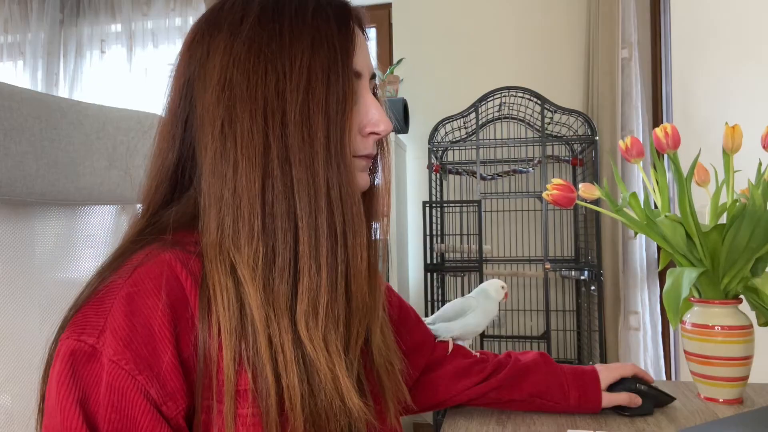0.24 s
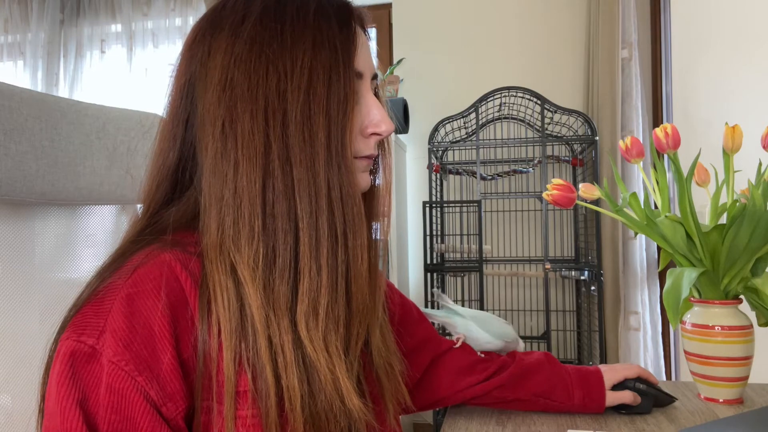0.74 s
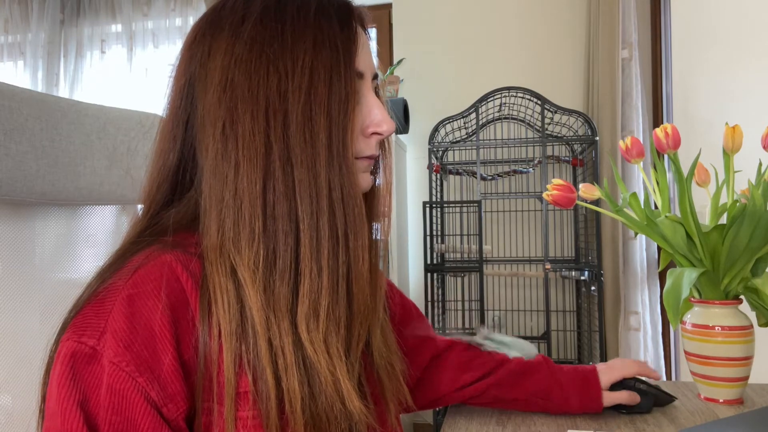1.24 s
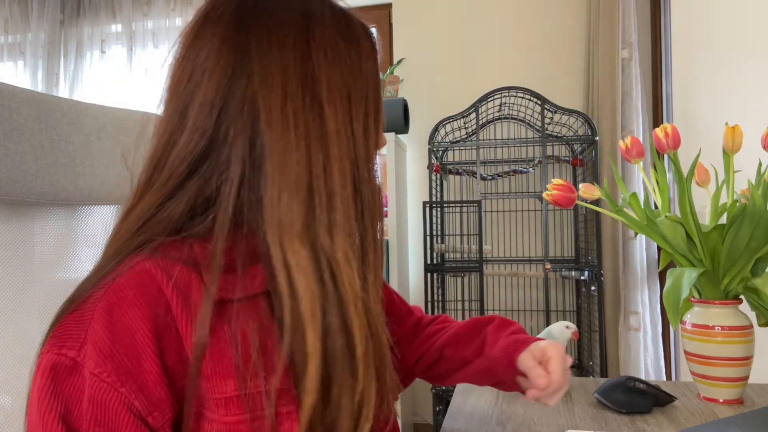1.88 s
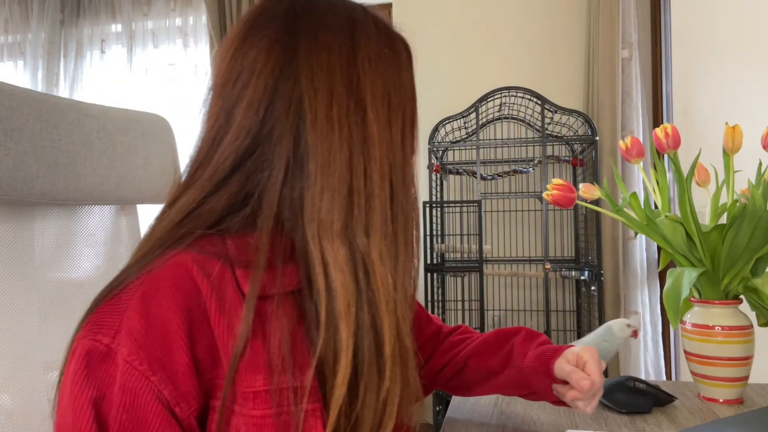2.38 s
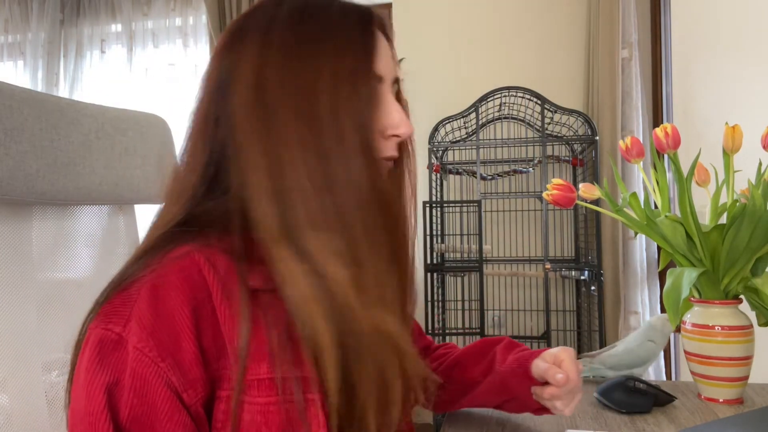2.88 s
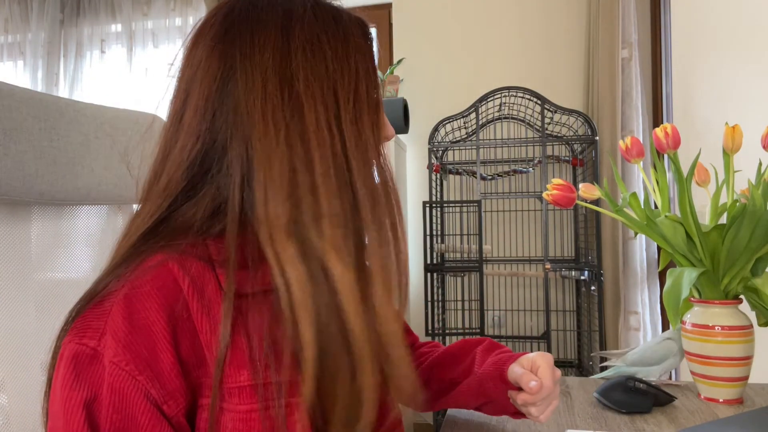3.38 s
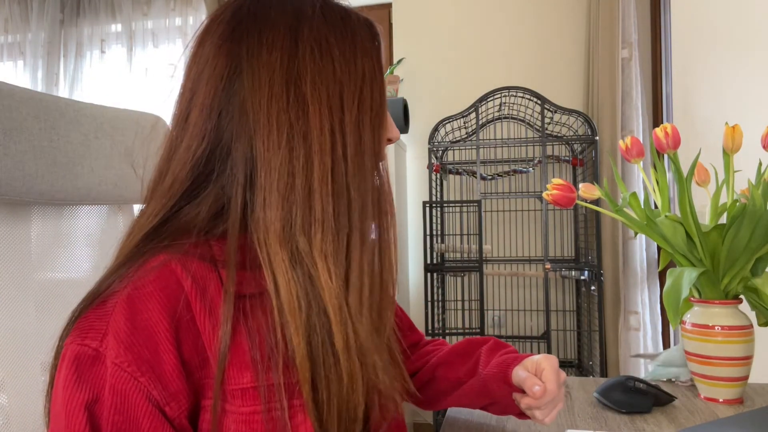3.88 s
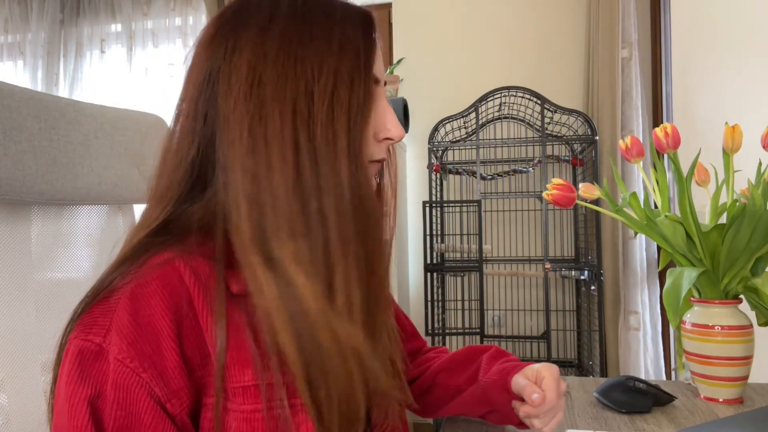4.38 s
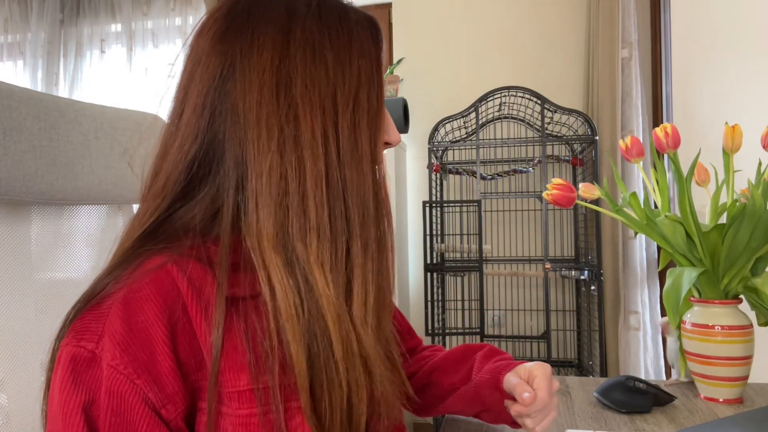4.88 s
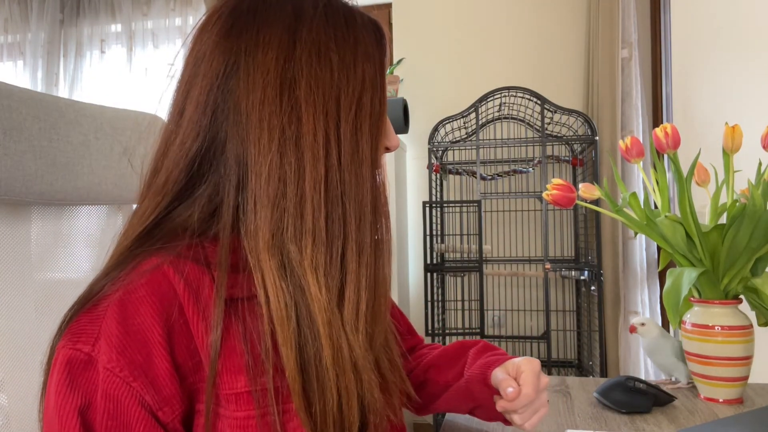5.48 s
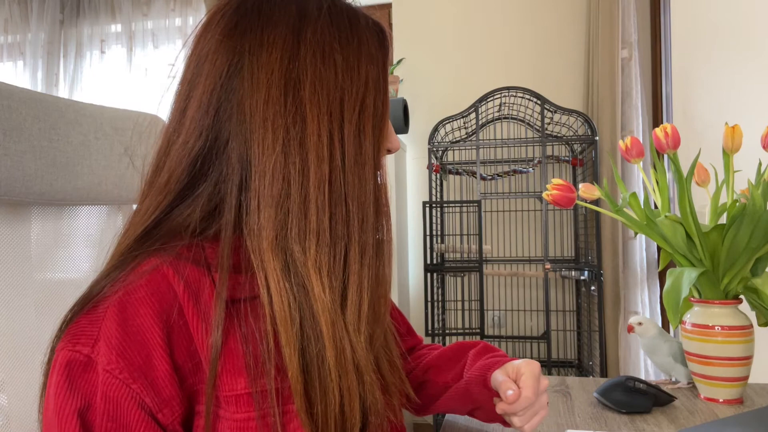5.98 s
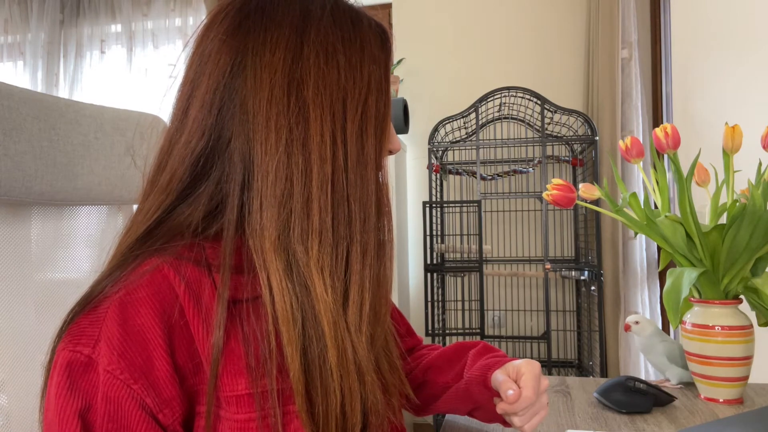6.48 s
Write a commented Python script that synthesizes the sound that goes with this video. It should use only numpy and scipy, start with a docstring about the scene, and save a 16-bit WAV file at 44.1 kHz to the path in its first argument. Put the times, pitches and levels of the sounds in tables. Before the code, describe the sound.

In a small airy office, a mug is set down and scrapes, followed by scratchy sleeve scuffs, crackly clicks and soft desk taps.

```python
"""A ceramic mug is set down on a desk and slides a little: struck modes, a rattle and grating friction. Then a
sleeve and long hair rustle as someone turns in a chair: chance slips of fibres, with short scratchy scuffs and
dry clicks that ring through folds of cloth; one sharp click at 2.557 s is the bright crack of a desk tap. Light
taps are struck modes of the desk; dull rubs, thin squeaks and a tink come and go. An appliance hums low, as
wavering sines, in the airy small office."""
import sys
import numpy as np
from scipy import signal
from scipy.fft import rfft, irfft, next_fast_len
from scipy.io import wavfile

SR = 44100
rng = np.random.default_rng(int(sys.argv[2]) if len(sys.argv) > 2 else 0)


def dump_mix(stems):
    """Bounce the given channels to the path in sys.argv[1] as a 16-bit WAV at rate SR."""
    frames = np.atleast_2d(stems).T  # one column per channel
    limited = np.clip(frames, -1, 1)  # hard clip at full scale
    pcm = np.round(limited * 32767).astype(np.int16)
    wavfile.write(sys.argv[1], SR, pcm)


N = 297234
TIME = np.arange(N) / SR  # s
# Table levels are relative: layer trims, random variation and the room still act on them.


def from_db(db):
    """Decibels to gain."""
    return 10 ** (np.asarray(db) / 20)


def rms_one(x):
    """Scale to unit rms."""
    return x / np.sqrt(np.mean(x ** 2) + 1e-20)


def at_hz(points, hz):
    """Read a table on a log-frequency axis."""
    known_hz, values = np.transpose(points)
    return np.interp(np.log(np.maximum(hz, 1)), np.log(known_hz), values)


def coloured(x, spectrum):
    """Give a steady excitation a spectrum; rms 1."""
    size = next_fast_len(N)
    hz = np.fft.rfftfreq(size, 1 / SR)
    shaped = rfft(x, size) * from_db(at_hz(spectrum, hz))
    return rms_one(irfft(shaped, size)[:N])


def lowpassed(x, order, cutoff_hz):
    """Roll off the treble with a Butterworth filter."""
    return signal.sosfilt(signal.butter(order, cutoff_hz, fs=SR, output="sos"), x)


def drift(rate):
    """Slow chance with spread 1, changing about rate times a second."""
    step = 40  # samples between drawn points
    r = np.exp(-2 * np.pi * rate * step / SR)
    noise = rng.standard_normal(N // step + 2002)
    slow = signal.lfilter([1], [1, -2 * r, r * r], noise)[2000:]  # skip the filter's start
    return np.interp(np.arange(N) / step, np.arange(len(slow)), rms_one(slow))


def slips(per_s, spread_db):
    """Friction: tiny slips at random moments, of uneven size and sign."""
    born = rng.random(N) < per_s / SR
    sign = rng.choice([-1, 1], N)
    return born * sign * from_db(spread_db * np.minimum(rng.exponential(1, N), 4))


def ring(s, db, hz, t60):
    """Impulses at the times s set one damped mode ringing."""
    impulses = np.full(N, 1e-18)
    impulses[np.round(np.asarray(s) * SR).astype(int)] = from_db(db)
    r = np.exp(-np.log(1000) / (t60 * SR))
    w = 2 * np.pi * hz / SR
    return signal.lfilter([0, np.sin(w)], [1, -2 * r * np.cos(w), r * r], impulses)


def struck(blows, modes):
    """Each blow rings every mode: weight moves the low ones, a soft contact spares the high ones."""
    s, blow_db, weight_db, contact_hz = np.transpose(blows)
    out = 0
    for hz, mode_db, t60 in modes:
        heavy_db = weight_db * (hz < 800)
        soft_db = -10 * np.log10(1 + (hz / contact_hz) ** 4)
        chance_db = rng.standard_normal(len(s))
        out = out + ring(s, blow_db + mode_db + heavy_db + soft_db + chance_db, hz, t60)
    return out


def swell(t, s, db, length, shape):
    """Gain of one movement that peaks at s: it rises, rounds off and fades."""
    rise, fall, roundness = shape
    age = (t - s) / length
    return from_db(db) * np.exp(-np.abs(age / np.where(age < 0, rise, fall)) ** roundness)


def movements(rows, shape):
    """Gain over time of overlapping movements; their powers add."""
    return np.sqrt(sum(swell(TIME, *row, shape) ** 2 for row in rows))


def resonance(x, hz, q):
    """One resonance with gain 1 on top."""
    return signal.lfilter(*signal.iirpeak(hz, q, fs=SR), x)


def pitched_friction(grains, rows, level_db, shape, q):
    """Friction through two equal resonances in a row, swelling once for each table row."""
    out = 0
    for s, db, length, hz in rows:
        tone = rms_one(resonance(resonance(grains, hz, q), hz, q))
        out = out + swell(TIME, s, level_db + db, length, shape) * tone
    return out


def bent(x, share):
    """Let the pitch of a sound wander quickly by a small share."""
    return np.interp(np.cumsum(1 + share * drift(25.03)) % N, np.arange(N), x)


# Motor and mains lines: [pitch_hz, rms_db]
MOTOR_LINES = [(47.7, -42.8), (99.9, -61.8)]
# Fainter tones of the appliance casing: [pitch_hz, rms_db]
CASING_TONES = [(29, -63.5), (32.6, -68), (131, -74.5), (167, -76.5), (199, -74.5), (293.6, -76),
                (391.5, -83.5), (586.5, -86), (685, -80)]


def hum(lines, waver_db, waver_turns):
    """Steady tones that waver a little in strength and phase."""
    out = 0
    for hz, line_db in lines:
        phase = 2 * np.pi * (hz * TIME + rng.random() + waver_turns * drift(0.76))
        level = np.sqrt(2) * from_db(line_db + waver_db * drift(1.5))
        out = out + level * np.sin(phase)
    return out


# Spectrum of room air and hiss: [frequency_hz, level_db_per_hz]
AIR_COLOUR = [(20, 1), (45, -2.5), (70, -6.5), (95, -13), (190, -14.5), (330, -17), (550, -24.5),
              (950, -30), (1500, -35), (3000, -40.5), (6000, -44.3), (11000, -45.5), (16000, -48.5)]


def room_air(level_db):
    """A steady noise bed that falls away toward the treble."""
    return from_db(level_db) * coloured(rng.standard_normal(N), AIR_COLOUR)


# How long the room rings: [frequency_hz, t60_s]
ROOM_DECAY = [(100, 0.78), (500, 0.72), (1500, 0.52), (4000, 0.69), (14000, 0.44)]


def office_echoes(first_s, build_s):
    """Dense reflections that build up after the first wall and die by band; unit energy."""
    t = TIME[:SR // 2]
    tail = 0
    edges_hz = np.geomspace(60, 16000, 9)
    for low, high in zip(edges_hz, edges_hz[1:]):
        band_filter = signal.butter(2, [low, high], "band", fs=SR, output="sos")
        band = signal.sosfilt(band_filter, rng.standard_normal(len(t)))
        t60 = at_hz(ROOM_DECAY, np.sqrt(low * high))
        tail = tail + band * np.exp(-np.log(1000) * t / t60)
    tail = tail * np.clip((t - first_s) / build_s, 0, 1)
    return tail / np.sqrt(np.sum(tail ** 2))


# A soft low bump: [start_s, level_db, pitch_hz, t60_s]
LOW_BUMP = (0.142, -41, 74, .09)
# Light taps on the desk: [start_s, strength_db, weight_db, contact_hardness_hz]
DESK_TAPS = [(0.158, -16, -8, 7000), (2.139, -4.5, -13, 1790), (2.5565, 1.5, -7.5, 9000),
             (2.5605, -10, 3, 2500), (2.607, -20, 2, 700), (3.004, -9.5, -1.5, 1200),
             (3.221, -12.5, -5, 2000), (3.773, -8.5, -5, 2100), (3.781, -14, -12, 2000),
             (4.166, -7.5, -8, 2010), (4.216, -9, -15, 1700), (4.7474, -3, -10, 2500),
             (4.7508, -15, 8, 6000), (4.7529, -9, 11, 3000)]
# What the taps set ringing: [pitch_hz, level_db, t60_s]
DESK_MODES = [(350, -66, 0.084), (484, -57, .035), (500, -56.5, 0.047), (517, -57, 0.32), (540, -58, 0.035),
              (742, -56.5, 0.029), (890, -48.5, 0.0098), (1260, -49.5, 0.0078), (2100, -52.5, 0.0093),
              (2580, -55.5, 0.024), (3160, -54, 0.0084), (3750, -54, 0.01), (4100, -54, 0.0049),
              (9050, -47, 0.00088)]


def small_knocks(tap_db):
    """Light taps ring the desk's damped modes; a soft bump rings one low mode."""
    return from_db(tap_db) * struck(DESK_TAPS, DESK_MODES) + ring(*LOW_BUMP)


# Faint thin squeaks: [peak_s, level_db, length_s, pitch_hz]
THIN_SQUEAKS = [(0.19, -74, 0.005, 5900), (0.204, -72, 0.005, 6350)]
# Swell of squeaks, scuffs and chatters: [rise_lengths, fall_lengths, roundness]
CATCH_SHAPE = (0.63, 0.92, 1.75)


def squeaks():
    """Dense slips narrowed by resonance into two faint, thin squeaks."""
    grains = slips(per_s=5500, spread_db=0.0)
    return pitched_friction(grains, THIN_SQUEAKS, 0.0, CATCH_SHAPE, q=6)


# Dull rubs of the arm on the desk: [peak_s, level_db, length_s, pitch_hz]
ARM_RUBS = [(0.2, -74, 0.048, 754), (0.377, -72, 0.029, 700), (0.692, -72.5, 0.025, 710),
            (1.142, -60.5, 0.017, 278), (1.263, -63, 0.035, 295), (2.618, -74, 0.024, 345),
            (2.667, -62.5, 0.02, 205)]
# Swell of rubs and strokes: [rise_lengths, fall_lengths, roundness (1 pointed, 2 bell)]
DRAG_SHAPE = (1, 1.7, 1.95)


def rubs(level_db):
    """Cloth dragged under the weight of the arm gives a short, muffled murmur of the desk top."""
    grains = slips(per_s=2600, spread_db=2.5)
    return pitched_friction(grains, ARM_RUBS, level_db, DRAG_SHAPE, q=1.02)


# Modes of the mug's wall, rung by its scraping foot: [pitch_hz, width_hz, level_db]
WALL_MODES = [(980, 140, 5), (1343, 56, 4), (1790, 130, 5), (2090, 100, -13), (2430, 93, 0.5),
              (2950, 200, -31), (4400, 440, -38)]


def mug_wall(shift_db, wander):
    """Blunt slips ring the wall; as contact moves, its modes bend in pitch and take turns to lead."""
    grains = lowpassed(slips(per_s=3000, spread_db=0.5), 2, 4200)
    out = 0
    for hz, width, db in WALL_MODES:
        tone = rms_one(resonance(grains, hz, hz / width))
        out = out + bent(from_db(db + shift_db * drift(8.2)) * tone, wander)
    return rms_one(out)


# Mug meeting the desk, rim first, then settling: [start_s, strength_db, weight_db, contact_hardness_hz]
LANDING_BLOWS = [(0.8383, 0.5, -23, 4600), (0.8405, -6, -19, 3300), (0.8416, -6, -12, 3000),
                 (0.8452, -23, 15, 2400), (0.8492, -23, 22.5, 2500), (0.8545, -19, -2, 2800),
                 (0.889, -13, 8, 220), (0.976, -26.5, 9, 1500)]
# Mug and desk top together: [pitch_hz, level_db, t60_s]
MUG_DESK_MODES = [(138, -45, 0.6), (200.4, -48, 0.21), (272, -53, 0.087), (352, -52, 0.11),
                  (490, -45, 0.08), (514, -46.5, 0.18), (632, -35, 0.054), (693, -43, 0.21),
                  (756, -52, 0.06), (900, -48, 0.11), (940, -39, 0.019), (1020, -23, 0.016),
                  (1050, -38.5, 0.13), (1090, -40, 0.09), (1158, -51, 0.36), (1220, -41, 0.027),
                  (1310, -48, .09), (1460, -49, 0.02), (1610, -41, 0.14), (1640, -41, 0.042),
                  (2030, -46, .07), (1760, -43, 0.0068), (2100, -41, 0.03), (2430, -59, 0.066),
                  (2740, -60, 0.03), (2960, -59, 0.016), (3870, -66, .025), (4330, -72, .012),
                  (5600, -71, .006)]
# Spectrum of the foot grinding: [frequency_hz, level_db_per_hz]
GRIND_COLOUR = [(110, 2.5), (280, -2), (500, 3.5), (720, -0.5), (930, 5), (1400, -8.5), (2400, -12),
                (3300, -18.5), (6000, -33), (12000, -51)]
# Nudges along the desk, timed at the fastest: [peak_s, level_db, length_s]
MUG_PUSHES = [(0.98, -63.5, 0.046), (1.06, -59, 0.045), (1.235, -61, 0.057), (1.3, -60, 0.09)]
# A push gathers speed and slows: [rise_lengths, fall_lengths, roundness]
NUDGE_SHAPE = (1, 1.33, 1.3)
# The foot sticking and jerking free: [start_s, level_db, fade_s]
FOOT_JERKS = [(1.111, -58.5, 0.017), (1.385, -56.5, 0.013)]
# The rim of the foot bites and chatters, timed at the hardest: [peak_s, level_db, length_s]
FOOT_CHATTERS = [(0.964, -72, 0.0055), (1.045, -63, 0.02), (1.071, -48.5, 0.012), (1.265, -71, .012),
                 (1.295, -62.5, .012), (1.425, -58, 0.007)]


def mug(knock_db, slide_db, judder_db, wall_db, chatter_db):
    """A dull knock, damped by the hand, then the unglazed foot grates over the desk in fits and starts."""
    # The desk gives a little, which rounds off the top of the knock
    knock = from_db(knock_db) * lowpassed(struck(LANDING_BLOWS, MUG_DESK_MODES), 2, 7000)
    age = TIME - LANDING_BLOWS[0][0]
    # The foot ring grinds as the mug lands, and comes to rest
    landing = from_db(-52) * np.exp(-np.abs(age) / 0.07)
    sliding = np.hypot(landing, movements(MUG_PUSHES, NUDGE_SHAPE))
    friction = sliding * (age > 0) * from_db(judder_db * drift(27))
    for s, level_db, fade in FOOT_JERKS:
        friction = friction + from_db(level_db) * (TIME > s) * np.exp(-np.abs(TIME - s) / fade)
    grains = slips(per_s=1400, spread_db=1.0)
    grind = from_db(slide_db) * friction * coloured(grains, GRIND_COLOUR)
    chatter = from_db(chatter_db) * movements(FOOT_CHATTERS, CATCH_SHAPE)
    bite = from_db(wall_db) * friction + chatter
    return knock + grind + bite * mug_wall(shift_db=2.5, wander=0.025)


# Spectrum of the rocking foot: [frequency_hz, level_db_per_hz]
ROCKING_COLOUR = [(400, -5), (800, 1), (1200, 1), (1600, 1), (2100, -5), (2600, -5.5), (3200, -24),
                  (6000, -30), (12000, -45)]


def rattle(start_s, level_db, fade_s):
    """Just after it lands the mug rocks on its foot ring: a quickly dying run of tiny hard contacts."""
    age = TIME - start_s
    fading = (age > 0) * np.exp(-np.abs(age) / fade_s)
    contacts = coloured(slips(per_s=1600, spread_db=2.5), ROCKING_COLOUR)
    return from_db(level_db) * fading * contacts


def fold_ring(burst, hz):
    """Each fold favours a pitch of its own; the desk reflects it after a slightly random lag."""
    fold = from_db(-3) * (burst + resonance(burst, hz, 4.5))
    lag = int(0.0008 * SR * rng.uniform(.75, 1.25))
    return fold + from_db(-5.5) * np.roll(fold, lag)


# A fold of cloth catches and slips: [peak_s, level_db, length_s, treble_over_middle_db, pitch_hz]
CLOTH_SCUFFS = [(1.333, -60.5, 0.029, 1, 4730), (1.42, -62, 0.078, 3, 4100), (1.814, -72, 0.0091, 2, 4300),
                (1.875, -65, 0.011, 1, 2530), (2.088, -65.5, 0.02, -2, 2620),
                (2.235, -58, 0.011, 0.5, 4160), (2.454, -65, 0.017, -1, 7750), (2.49, -72, .016, -1, 4200),
                (2.659, -60.5, 0.01, 2, 7750), (3.294, -63, 0.018, 2.5, 8400),
                (3.741, -53, 0.0099, 0.5, 8500), (4.122, -65.5, 0.0087, 2, 7000),
                (4.38, -74, 0.017, -5, 4200), (4.456, -57.5, 0.0081, 3, 2100),
                (4.716, -62, 0.018, -2, 8800), (4.993, -56, 0.012, 5, 3200), (5.26, -61, 0.023, 2.5, 8800),
                (6.261, -67.5, 0.011, 3.5, 3950)]
# Dry clicks and crackles, mostly of the cloth; the one at 2.5569 s is the bright crack of a desk tap: [peak_s,
# level_db, length_s, treble_over_middle_db, pitch_hz]
DRY_CLICKS = [(1.2374, -48.5, 0.0034, 0, 3900), (1.3178, -61, 0.0047, -2, 4700),
              (1.3842, -50, 0.006, 6, 2100), (1.4162, -55, 0.0035, -3, 10200),
              (1.5516, -48, 0.0052, 6, 4300), (1.7159, -56.5, 0.0046, 1, 4330),
              (1.7396, -58.5, 0.0061, 4, 7750), (1.7861, -56, 0.0043, 1, 4300),
              (1.808, -53, 0.0034, 1, 4230), (1.82, -58, 0.0035, -3, 4350), (1.8499, -59, 0.0033, -1, 4300),
              (2.012, -55.5, 0.0051, -5, 2030), (2.1383, -54.5, 0.0047, 0, 8100),
              (2.1758, -61, 0.003, -4, 4500), (2.3449, -63, 0.005, -3, 6000),
              (2.5569, -50.5, 0.0043, 0, 3580), (2.8875, -57.5, 0.0053, 0, 6900),
              (3.0087, -52.5, 0.0035, 2, 8800), (3.1981, -57, 0.0027, 2, 8800),
              (3.2505, -54.5, 0.0046, 6, 8700), (3.2911, -68, 0.005, 5, 8400),
              (3.3941, -67, 0.0035, 6, 10000), (3.4204, -69, 0.0044, 0, 6700),
              (3.435, -58.5, 0.0031, 2, 8200), (3.4683, -59, 0.005, -1, 5900),
              (3.5408, -54.5, 0.0022, -1, 2280), (3.5587, -58, 0.0049, -2, 8300),
              (3.695, -56.5, 0.0049, 4, 9500), (3.868, -64, 0.006, -2, 8500),
              (3.9132, -53, 0.0048, -3.5, 10100), (4.0092, -56.5, 0.0026, 5, 10200),
              (4.0629, -64, 0.0037, 1, 8400), (4.0957, -65, 0.0037, 5, 8000),
              (4.367, -60.5, 0.005, -7, 6000), (4.4595, -55, 0.003, 6, 6500),
              (4.4814, -60, 0.0034, 0, 3100), (4.5148, -48.5, 0.0027, -2, 6700),
              (4.525, -58, 0.002, 3, 8000), (4.5535, -60, 0.005, 5, 6000), (4.6139, -61, 0.0047, 4, 6700),
              (4.6277, -53.5, 0.0058, 3, 6740), (4.6708, -56, 0.0031, 1, 7100),
              (4.6811, -54, 0.0047, 1, 3100), (4.7198, -51, 0.0017, 5, 5600),
              (4.7321, -57, 0.0017, 2, 9400), (4.7505, -44, 0.0033, -3, 10400),
              (4.9685, -59, 0.0017, -2, 6760), (5.116, -60, 0.0035, 1, 3200)]
# Swell of a click: [rise_lengths, fall_lengths, roundness]
SNAP_SHAPE = (0.23, 0.92, 0.71)
# Middle part of the scuff sound: [frequency_hz, level_db_per_hz]
MIDDLE_COLOUR = [(600, -11), (1300, 0), (2100, 6.5), (3200, 2), (4400, 2), (6000, -2.5), (9000, -37)]
# Treble part of the scuff sound: [frequency_hz, level_db_per_hz]
TREBLE_COLOUR = [(3000, -16), (5000, -8), (7000, 4.5), (9800, 5), (12500, 1), (16000, -9)]


def scuffs(middle_db, treble_db, click_db, stutter_db):
    """A fold catches and lets go: a stuttering burst of slips; clicks are shorter and start more abruptly."""
    grains = slips(per_s=6000, spread_db=2.2)
    middle = from_db(middle_db) * coloured(grains, MIDDLE_COLOUR)
    treble = from_db(treble_db) * coloured(grains, TREBLE_COLOUR)
    stutter = rms_one(from_db(stutter_db * drift(120)))
    steady = np.full(N, from_db(click_db))
    out = np.zeros(N)
    for rows, shape, grip in (CLOTH_SCUFFS, CATCH_SHAPE, stutter), (DRY_CLICKS, SNAP_SHAPE, steady):
        for s, level_db, length, bright_db, hz in rows:
            near = slice(int((s - .1) * SR), int((s + .2) * SR))
            burst = grip[near] * swell(TIME[near], s, level_db, length, shape)
            ratio = from_db(bright_db)
            blend = (middle[near] + ratio * treble[near]) / np.hypot(1, ratio)
            out[near] += fold_ring(burst * blend, hz)
    return out


# Strokes of sleeve and hair, timed at the fastest: [peak_s, level_db, length_s]
SLEEVE_STROKES = [(1.29, -68.5, 0.079), (1.52, -64, 0.11), (1.8, -71, 0.082), (2.13, -76.5, 0.12),
                  (2.75, -70, 0.14), (3.03, -66, 0.076), (3.18, -72.5, 0.069), (3.49, -73, 0.1),
                  (3.735, -68, 0.055), (3.89, -74.5, 0.068), (4.1, -78.5, 0.091), (4.245, -69, 0.052),
                  (4.43, -64.5, 0.064), (4.755, -65.5, 0.039), (5.06, -74, 0.12), (5.28, -73, 0.049)]
# Spectrum of brushing fibres: [frequency_hz, level_db_per_hz]
FIBRE_COLOUR = [(200, 2), (500, 5.5), (1000, 3.5), (2000, 0.5), (3000, -1.5), (4500, -0.5), (6500, -1),
                (9500, -2.5), (12500, -8), (16000, -14)]


def brushing(level_db, flutter_db, crackle_db):
    """Thousands of fibres slip past each other under an uneven pressure; now and then one snags."""
    fibres = rms_one(slips(per_s=9800, spread_db=-1.0))
    snags = from_db(crackle_db) * rms_one(slips(per_s=200, spread_db=2.0))
    pressure = from_db(level_db + flutter_db * drift(24))
    return coloured(fibres + snags, FIBRE_COLOUR) * movements(SLEEVE_STROKES, DRAG_SHAPE) * pressure


# Modes of one tiny metallic tink: [pitch_hz, level_db, t60_s]
METAL_MODES = [(3020, -59, .03), (3540, -60, 0.013), (3970, -59, 0.093), (6150, -62, 0.02),
               (7060, -58, 0.015), (8950, -65, 0.015)]


def tink(start_s):
    """One tiny metallic tink: a single impulse rings a few high damped modes."""
    return sum(ring(start_s, db, hz, t60) for hz, db, t60 in METAL_MODES)


def scene():
    """Mug, taps and cloth share one room, over hum and air; the desk top booms into it, its clicks stay dry."""
    appliance = hum(MOTOR_LINES, waver_db=0.26, waver_turns=0.011)
    appliance = appliance + hum(CASING_TONES, waver_db=2.0, waver_turns=0.032)
    air = room_air(level_db=-57.5)
    knocks = small_knocks(tap_db=2.0) + rubs(level_db=1.0)
    boom = lowpassed(knocks, 1, 1100)  # the desk top radiates into the room below this
    cup = mug(knock_db=-7.0, slide_db=0.5, judder_db=1.3, wall_db=-9.5, chatter_db=-6.0)
    cup = cup + rattle(start_s=0.8415, level_db=-47.5, fade_s=0.019)
    cloth = scuffs(middle_db=0.0, treble_db=-1.5, click_db=-2.5, stutter_db=2.0)
    cloth = cloth + brushing(level_db=0.17, flutter_db=1.0, crackle_db=-5.5)
    tiny = squeaks() + tink(start_s=3.492)
    to_walls = from_db(-11.5) * cup + from_db(-8.0) * boom
    to_walls = to_walls + from_db(-11.0) * cloth + from_db(-14.0) * tiny
    room = signal.fftconvolve(to_walls, office_echoes(first_s=0.0035, build_s=0.0017))[:N]
    return (cup + knocks + cloth + tiny + room + air + appliance)[None]


def record(dry):
    """The top is cut steeply above 15.9 kHz."""
    return signal.sosfilt(signal.ellip(12, .1, 90, 15900, fs=SR, output="sos"), dry)


dry = scene()
out = record(dry)
dump_mix(out)
```